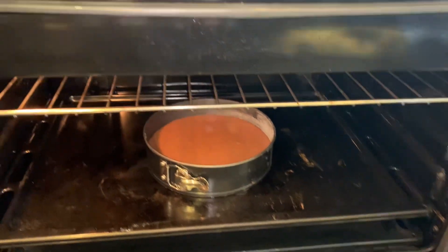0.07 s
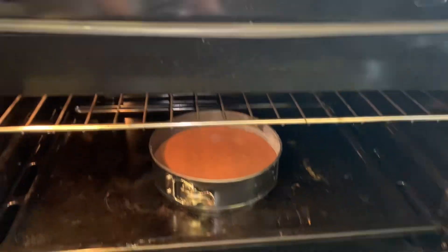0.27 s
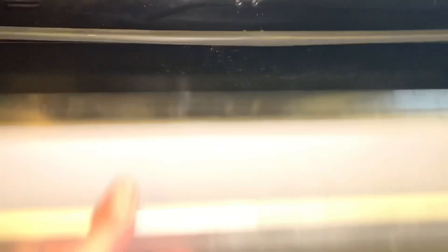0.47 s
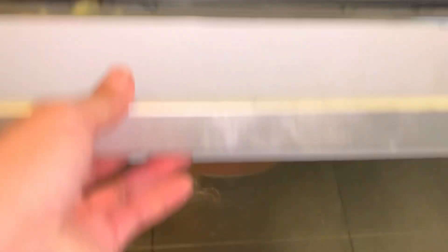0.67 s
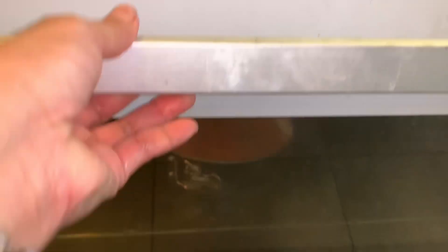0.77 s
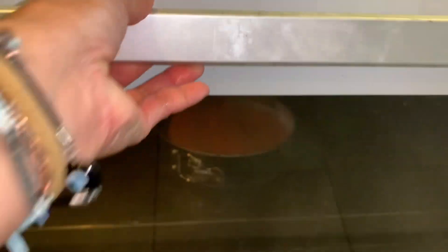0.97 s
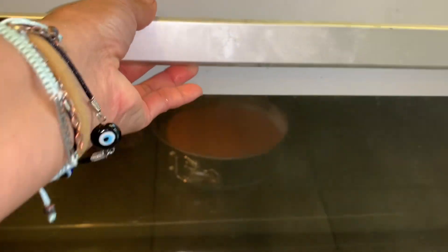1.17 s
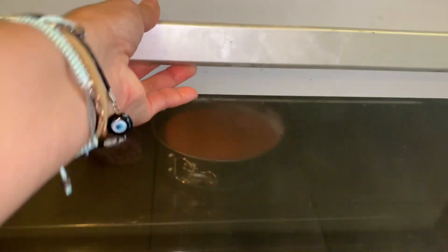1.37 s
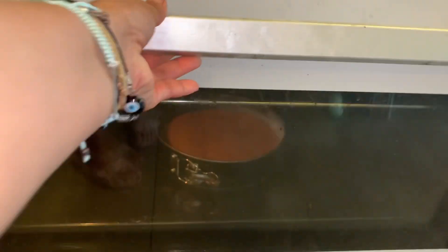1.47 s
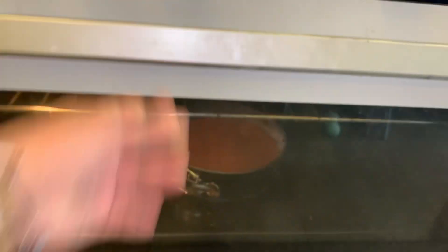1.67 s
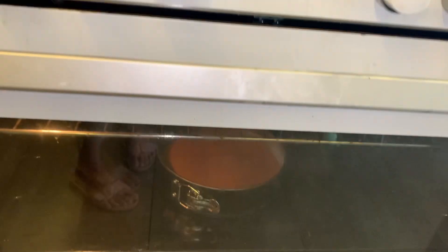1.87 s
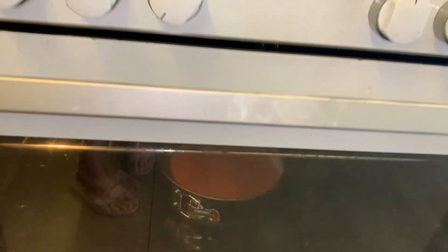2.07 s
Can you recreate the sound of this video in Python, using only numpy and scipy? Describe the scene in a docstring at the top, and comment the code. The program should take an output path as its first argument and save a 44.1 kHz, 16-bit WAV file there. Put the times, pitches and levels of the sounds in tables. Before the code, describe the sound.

An oven door swings shut close to the microphone in a home kitchen; dry hinges grind unevenly with hollow boom, springs snap, then the catch clacks and the door thuds with a rattling shudder.

```python
"""In a kitchen, an oven door is pushed shut close to a phone.
Stick-slip in the hinges grinds unevenly and rings the hinge arms and the sheet-metal door, over cavity boom;
jolts push the door; sharp snaps of the springs and the catch are noise bursts with a metallic ring. A faint
hinge squeak precedes the landing. The catch clacks, then the door thuds and rebounds on its seal as decaying
modes and shudders out as shaped noise. The room answers, each band decaying at its own speed, over a hush."""
import sys
import numpy as np
from scipy import signal
from scipy.fft import rfft, irfft, next_fast_len
from scipy.io import wavfile
from scipy.ndimage import map_coordinates

SR = 44100
rng = np.random.default_rng(int(sys.argv[2]) if len(sys.argv) > 2 else 0)


def elevation(decibels):
    """Turn decibel levels (scalar or array-like) into linear amplitude ratios."""
    levels = np.asarray(decibels, float)
    return 10 ** (levels / 20)


def generate_wav(sig):
    """Save sig (samples, or channels by samples) to the path in sys.argv[1] as 16-bit PCM at SR."""
    pcm = np.round(np.clip(np.atleast_2d(sig).T, -1, 1) * 32767).astype(np.int16)
    wavfile.write(sys.argv[1], SR, pcm)


N = 92830  # length in samples
SHUT_S = 1.5568  # the door meets its seal

# resonances of the sheet-metal door: centre_hz, width_hz, level_db
DOOR_MODES = [(219.8, 25.6, -5.5), (250.2, 18.2, -0.5), (295.5, 20, -3), (352, 45.8, -2), (394, 50.7, -1.5),
              (514.5, 82, -9), (713, 92, -9), (938, 100, -16.5)]
# resonances of the hinge arms: centre_hz, width_hz, level_db
ARM_MODES = [(760, 97, -1), (1014, 25.6, 3.5), (1100, 35, 5), (1232, 52, 2), (1344, 45, 1.5),
             (1393, 26, 1.5), (1516, 100, -5.5), (1670, 24, -2.5), (1870, 57, -4), (2045, 50, -4),
             (2445, 256, -10), (3510, 540, -12), (4030, 800, -15.5)]
# resonances of the oven cavity and door mass: centre_hz, width_hz, level_db
CAVITY_MODES = [(56.4, 21.7, 0), (84.4, 20.2, 0.5), (128.2, 18.7, -4.5), (187, 50.4, -9)]
# metallic resonances of the snaps and the rattle: centre_hz, width_hz, level_db
METAL_MODES = [(2710, 210, -2.5), (3300, 160, -2), (3800, 130, -2), (4104, 110, -1), (4410, 65, -3),
               (4890, 120, -6), (8650, 250, -7.5)]


def unit(x):
    """Normalisation: scale a signal to rms 1."""
    return x / np.sqrt(np.mean(x ** 2) + 1e-20)


def along(points, hz):
    """Log-frequency interpolation of (hz, value) points."""
    point_hz, values = np.transpose(points)
    return np.interp(np.log(hz + 1), np.log(point_hz + 1), values)


def filtered(x, response):
    """Linear filtering: multiply the spectrum by a complex response of frequency."""
    length = next_fast_len(N + SR)
    spectrum = rfft(x, length) * response(np.fft.rfftfreq(length, 1 / SR))
    return irfft(spectrum, length)[..., :N]


def body(modes):
    """Modal superposition: causal second-order resonances with alternating signs."""
    def resonance(f, centre_hz, width_hz):
        damping = 1j * f * width_hz
        return damping / (centre_hz * centre_hz - f * f + damping)

    return lambda f: sum((-1) ** k * elevation(level_db) * resonance(f, centre_hz, width_hz)
                         for k, (centre_hz, width_hz, level_db) in enumerate(modes))


def white():
    """White noise: independent normal samples."""
    return rng.standard_normal(N)


def ringing(force, modes):
    """Forced resonance: a force through a set of modes, scaled to rms 1."""
    return unit(filtered(force, body(modes)))


def hiss(spectrum):
    """Spectral shaping: white noise coloured by (hz, db per Hz) points, at rms 1."""
    return unit(filtered(white(), lambda hz: elevation(along(spectrum, hz))))


def since(s):
    """Elapsed time: seconds after s, zero before."""
    return np.maximum(np.arange(N) / SR - s, 0)


def blow(s, rise_s, t60_s):
    """Exponential build-up and decay: the envelope of an excitation that starts at s."""
    return (1 - np.exp(-since(s) / rise_s)) * elevation(-60 * since(s) / t60_s)


def wobble(rate):
    """Band-limited fluctuation: a smooth curve through random knots, rate of them a second."""
    knots = rng.standard_normal(int(N * rate / SR) + 4)
    return map_coordinates(knots, [np.arange(N) * rate / SR])


def slips():
    """Stick-slip friction: random slips of uneven size and either sign over smooth rubbing."""
    slips_per_s, spread_db = 700, 3
    smooth_share = 0.54  # share of the power that is smooth rubbing
    happens = rng.random(N) < slips_per_s / SR
    size_gain = elevation(spread_db * np.clip(white(), -2, 2))
    hits = happens * size_gain * rng.choice([-1, 1], size=N)
    return np.sqrt(1 - smooth_share) * unit(hits) + np.sqrt(smooth_share) * white()


def favoured(force, modes, pitch_hz, lift_db):
    """Selective modal excitation: ring the modes, lifting those near a moving pitch."""
    reach_octaves = 0.22
    total = 0
    for k, mode in enumerate(modes):
        octaves_away = np.log2(pitch_hz / mode[0])
        lift = elevation(lift_db * np.exp(-(octaves_away / reach_octaves) ** 2))
        total = total + (-1) ** k * filtered(force, body([mode])) * lift
    return unit(total)


def hinges():
    """Friction-driven vibration: slips ring door and arms, noise the cavity, till the door shuts."""
    # hinge travel: time_s, grind_db, scrape_db and boom_db (both relative to the grind),
    # contact_hz (pitch favoured by the contact point)
    hinge_travel = [(0.0, -68, 6, -23, 1100), (0.118, -32, -0.5, -13, 1700), (0.14, -44, 13, 3, 1640),
                    (0.174, -26.5, -0.5, -3.5, 1650), (0.26, -34, 6, -5, 1470), (0.307, -27.5, 2, -1, 1290),
                    (0.34, -32, 8.5, -1, 1440), (0.406, -34.5, 10, 3, 1270), (0.484, -29.5, 2.5, 2.5, 1010),
                    (0.54, -29.5, -4.5, -0.5, 1300), (0.57, -44, 4, 14.5, 1290), (0.642, -45, 0.5, 6, 1210),
                    (0.699, -30.5, -3, 3, 1080), (0.839, -44, -3.5, 10.5, 1270),
                    (1.012, -36.5, -1.5, 4.5, 900), (1.102, -41, -1.5, 5, 760), (1.144, -51, 6.5, 13, 760),
                    (1.162, -38, 1, 0.5, 760), (1.264, -52, 6, 15.5, 780), (1.33, -58, 3, 17.5, 800),
                    (1.432, -40, 0.5, -2, 734), (1.54, -47.5, 11, 10, 810)]
    # the panel flexes as it swings: time_s, favoured_hz
    panel_flex = [(0, 383), (.2, 337), (.24, 303), (.3, 382), (.42, 350), (.5, 273), (.7, 328), (1.44, 280)]
    # fine rasp of the scrape: frequency_hz, density_db (per Hz)
    rasp_spectrum = [(1000, -32), (2000, -4.5), (4000, -16.5), (7000, -18.5), (9000, -20), (12000, -25.5),
                     (14000, -28), (16000, -13.5)]
    t = np.arange(N) / SR
    travel_s, *columns = np.transpose(hinge_travel)
    grind_db, scrape_db, boom_db, contact_hz = [np.interp(t, travel_s, column) for column in columns]
    flex_hz = np.interp(t, *np.transpose(panel_flex))

    door = favoured(slips(), DOOR_MODES, flex_hz, lift_db=4)
    door = door * elevation(1.14 * wobble(31.04))
    rasp = elevation(-7) * hiss(rasp_spectrum) * elevation(2.27 * wobble(59.85))
    scrape = favoured(slips(), ARM_MODES, contact_hz, lift_db=8) + rasp
    boom = ringing(white(), CAVITY_MODES)
    mix = door + elevation(scrape_db - 7) * scrape + elevation(boom_db - 6) * boom
    return mix * elevation(grind_db - 210 * since(SHUT_S))  # falls a further 210 dB/s once shut


def ring(modes, s, rise_s):
    """Free modal decay: damped sinusoids struck at s."""
    return sum(elevation(level_db) * blow(s, rise_s, t60_s) * np.sin(2 * np.pi * pitch_hz * since(s))
               for pitch_hz, level_db, t60_s in modes)


def catch():
    """Build-up and release: modes swell as the catch rides up, then die after it snaps home."""
    # clack modes: pitch_hz, level_db, t60_s
    catch_modes = [(1462, 2.5, 0.034), (1781, 3, 0.016), (813, -4.5, 0.04)]
    snap_s, rise_s = 1.55, 0.0015
    t = np.arange(N) / SR - snap_s
    swell = elevation(-19) * np.exp(np.minimum(t, 0) / rise_s)
    return swell * sum(elevation(level_db - 60 * since(snap_s) / t60_s) * np.cos(2 * np.pi * pitch_hz * t)
                       for pitch_hz, level_db, t60_s in catch_modes)


def thud():
    """Impact on a compliant seal: low modes are struck, and struck again at each rebound."""
    # thud modes: pitch_hz, level_db, t60_s
    thud_modes = [(74.6, 1, 0.28), (90.9, 10.5, .33), (115.8, -8, 0.57), (143.2, -5, .22), (215, -14, 0.4),
                  (330, -12, 0.22), (393, -13, 0.24), (728, -8, 0.2)]
    # later contacts on the seal: delay_s (after the first), level_db (relative to the first)
    seal_rebounds = [(.0152, 1.8), (.0644, -5)]
    rise_s = 0.012
    total = ring(thud_modes, SHUT_S, rise_s)
    for delay_s, level_db in seal_rebounds:
        total = total + elevation(level_db) * ring(thud_modes, SHUT_S + delay_s, rise_s)
    return -elevation(-18.5) * total  # the first swing is negative


def shudder():
    """Decaying random vibration: glass and racks shake, the panel rings and the racks tick."""
    # glass and racks shaking: frequency_hz, density_db (per Hz)
    shaking_spectrum = [(100, -35), (150, -1), (400, -10), (1000, -13.5), (2000, -17.5), (4000, -29),
                        (8500, -37), (13000, -43), (16000, -47)]
    panel = elevation(-2) * ringing(slips(), DOOR_MODES)
    rattle = elevation(-12 + 2.2 * wobble(70)) * ringing(slips(), ARM_MODES[7:] + METAL_MODES[:4])
    shaking = hiss(shaking_spectrum) + panel + rattle
    flutter_db = 1.3 * wobble(110)
    return shaking * elevation(-27.5 + flutter_db) * blow(SHUT_S, rise_s=0.0055, t60_s=0.7)


def sway():
    """Cavity resonance: noise keeps the oven's low modes booming on after the door shuts."""
    return elevation(-28) * blow(SHUT_S, rise_s=0.056, t60_s=1.65) * ringing(white(), CAVITY_MODES)


def jolts():
    """Impulsive excitation: soft pushes ring the door, each with a short scuff of noise."""
    # jolts of the door: start_s, push_db (before the common push gain), scuff_db
    door_jolts = [(0.048, -31.5, -73), (0.108, -36, -61), (.166, -17, -52), (0.188, -12.5, -65),
                  (0.299, -17, -58), (0.529, -16, -50), (0.944, -21.5, -46), (1.028, -20, -61),
                  (1.159, -23.5, -51), (1.38, -33, -46), (1.433, -26.5, -41), (1.552, -18, -36),
                  (1.828, -27, -40), (2.033, -38, -47.5)]
    push_gain_db, push_s = 20.5, 0.00071
    push = sum(elevation(push_db + push_gain_db) * blow(start_s, push_s / 4, push_s * 3)
               for start_s, push_db, _ in door_jolts)
    scuff_level = sum(elevation(scuff_db) * blow(start_s, rise_s=0.0026, t60_s=0.15)
                      for start_s, _, scuff_db in door_jolts)
    scuff = ringing(white(), DOOR_MODES[4:] + ARM_MODES[:8])
    return filtered(push, body(DOOR_MODES)) + scuff_level * scuff


def snaps():
    """Transient excitation of resonances: bursts of noise with a metallic ring."""
    # sharp snaps of the springs and the catch:
    # start_s, level_db (before the burst or strike gain), tilt_db (per octave), t60_s
    sharp_snaps = [(.868, -29, 3, 0.081), (1.0805, -23, 1.5, 0.063), (1.384, -50.5, -7.5, 0.28),
                   (1.507, -60.5, -3, .04), (1.547, -21, 3.5, 0.038), (1.562, -20.5, 14, 0.026)]
    # burst before its tilt: frequency_hz, density_db (per Hz)
    burst_spectrum = [(700, -30), (1400, -3.5), (2700, -2), (4200, 5.5), (6000, -5.5), (9000, -5),
                      (12000, -12.5), (15500, -13), (16400, -40)]
    rise_s, burst_gain_db, strike_gain_db = 0.00133, -3, 27.5
    metallic = elevation(-2) * ringing(white(), METAL_MODES)
    strikes = np.zeros(N)
    bursts = np.zeros(N)
    for start_s, level_db, tilt_db, t60_s in sharp_snaps:
        # the more tilted a snap, the weaker its strike and metallic noise
        strikes[round((start_s + rise_s) * SR)] = elevation(level_db + strike_gain_db - 2 * abs(tilt_db))
        tilted = [(hz, density_db + tilt_db * np.log2(hz / 5000)) for hz, density_db in burst_spectrum]
        noise = hiss(tilted) + elevation(-abs(tilt_db)) * metallic
        bursts += elevation(level_db + burst_gain_db) * blow(start_s, rise_s, t60_s) * noise
    return filtered(strikes, body(METAL_MODES)) + bursts


def squeak():
    """Narrow-band resonance: rubbing noise in one hinge mode, begun before the door lands."""
    envelope = blow(1.355, rise_s=0.011, t60_s=0.4)
    return elevation(-55) * envelope * ringing(white(), [(3560, 160, 0)])


def spread(pair):
    """Diffuse-field coherence: mix two unrelated signals to a set left-right correlation."""
    # diffuse sound: frequency_hz, likeness (left-right correlation, limited to -1..1 in use)
    stereo_likeness = [(60, 0.97), (250, 0.9), (600, 0.67), (1500, -1.7), (4000, 0.044), (7000, 0.18),
                       (16000, 0.86)]

    def mid_side_gains(hz):
        angle = np.arccos(np.clip(along(stereo_likeness, hz), -1, 1)) / 2
        return np.array([np.cos(angle), np.sin(angle)])

    mid, side = filtered(pair, mid_side_gains)
    return np.array([mid + side, mid - side])


def kitchen(x):
    """Reverberation: convolve with a noise tail whose bands each die at their own speed."""
    # room decay: frequency_hz, t60_s
    room_decay = [(100, 0.43), (1000, 0.47), (5000, 0.49), (14000, 0.07)]
    noise = rng.standard_normal((2, SR))
    band_hz, t, bands = signal.stft(noise, SR, nperseg=256)
    decay = elevation(-60 * t / along(room_decay, band_hz)[:, None])
    tail = signal.istft(bands * decay, SR, nperseg=256)[1]
    tail = tail / np.linalg.norm(tail[0])
    delayed = np.pad(x, (200, 0))[:N]  # delay in samples
    # the room's answer is thinned below 208 Hz
    send = filtered(delayed, lambda f: 1 / (1 + (208 / (f + 1)) ** 2))
    return spread(signal.fftconvolve(send[None], tail, axes=1)[:, :N])


def hush():
    """Diffuse background noise: a quiet coloured hiss whose level wanders."""
    # kitchen hush: frequency_hz, density_db (per Hz)
    hush_spectrum = [(20, -43), (60, -7.5), (150, -11), (300, -10.5), (600, -19), (1300, -32.5),
                     (3500, -39.5), (8000, -69)]
    pair = np.array([hiss(hush_spectrum), hiss(hush_spectrum)])
    return elevation(-48 + 3.6 * wobble(9.39)) * spread(pair)


def scene():
    """Superposition: the oven heard directly and through the room, over the hush."""
    shutting = catch() + thud() + shudder() + sway()
    oven = hinges() + shutting + jolts() + snaps() + squeak()
    return oven + elevation(-7) * kitchen(oven) + hush()


def top_cut(x):
    """Nothing passes above the cut-off."""
    return signal.sosfilt(signal.butter(12, 16480, fs=SR, output="sos"), x)


def record(dry):
    """Two-port reception: the ports differ in level and phase, and a low cut thins the bass."""
    # level between the ports: frequency_hz, level_db (left over right)
    port_tilt = [(60, -1.3), (380, -1.6), (700, 1.5), (2380, 1), (4400, -2), (15000, .5)]
    # phase between the ports, apart from the lag: frequency_hz, lead_rad (left ahead of right)
    port_lead = [(30, -0.14), (300, 0.975), (1100, 2.5), (2300, 4.5), (2750, -0.5), (4200, 1.5),
                 (5700, 3.5), (7300, 1), (16000, 3)]
    lag_s, low_cut_hz = 0.000243, 38  # left port late by lag_s
    half = np.array([[0.5], [-0.5]])  # each port takes half of the difference

    def ports(hz):
        level = elevation(half * along(port_tilt, hz))
        phase = half * (along(port_lead, hz) - 2 * np.pi * hz * lag_s)
        low_cut = 1 / (1 + (low_cut_hz / (hz + 1)) ** 4)
        return level * np.exp(1j * phase) * low_cut

    return top_cut(filtered(dry, ports))


dry = scene()
out = record(dry)
generate_wav(out)
```